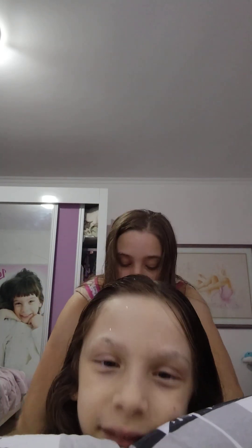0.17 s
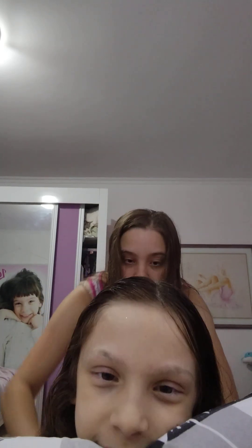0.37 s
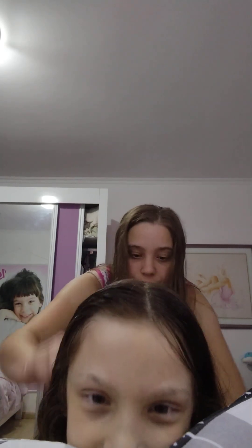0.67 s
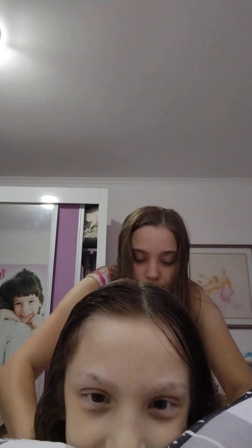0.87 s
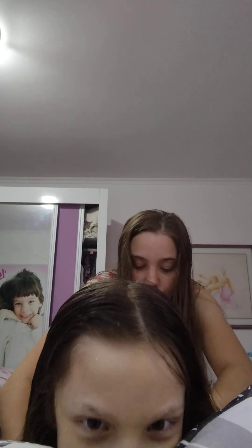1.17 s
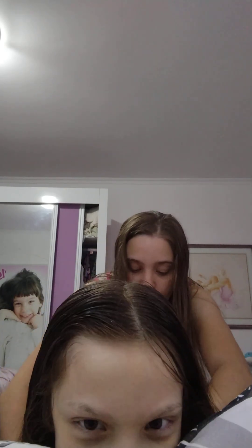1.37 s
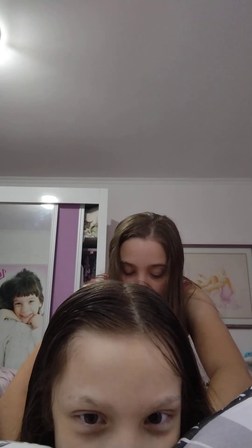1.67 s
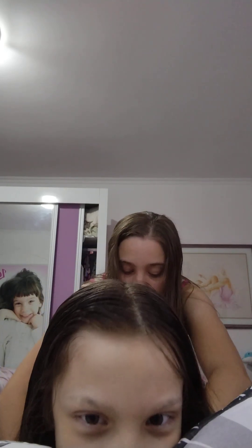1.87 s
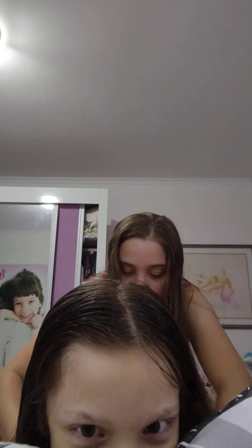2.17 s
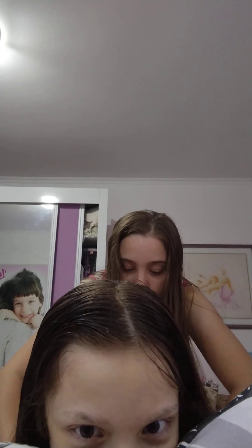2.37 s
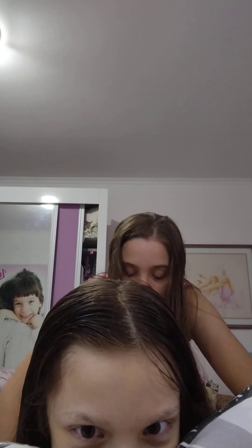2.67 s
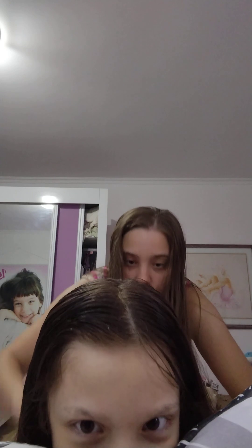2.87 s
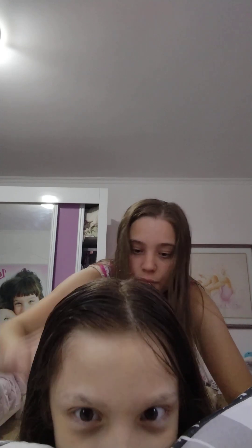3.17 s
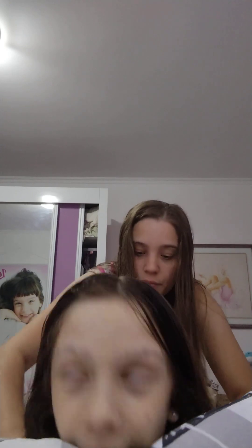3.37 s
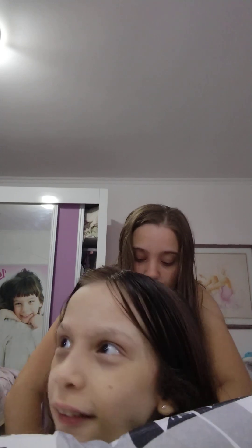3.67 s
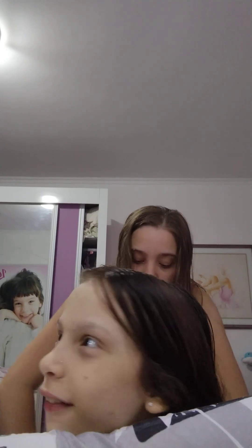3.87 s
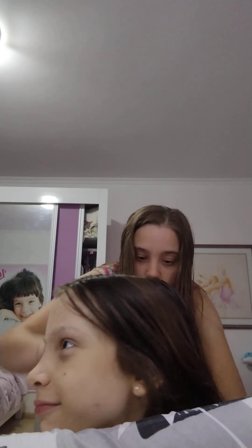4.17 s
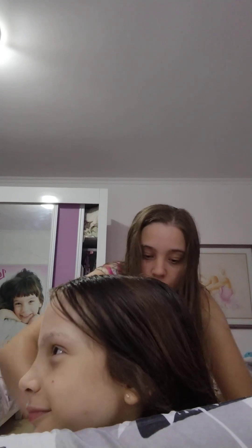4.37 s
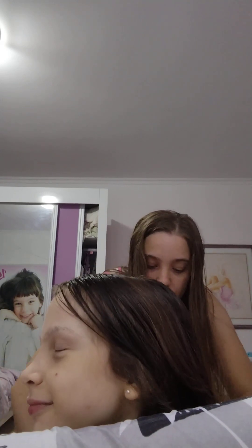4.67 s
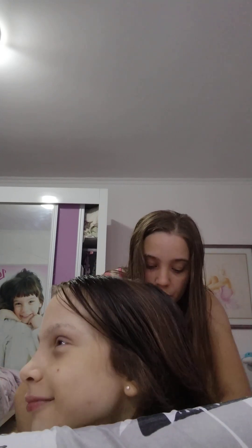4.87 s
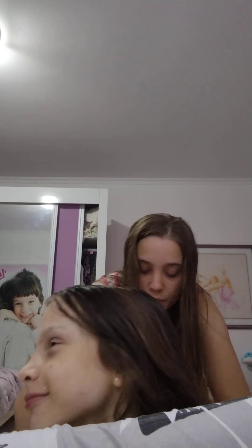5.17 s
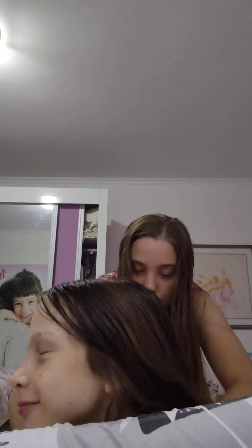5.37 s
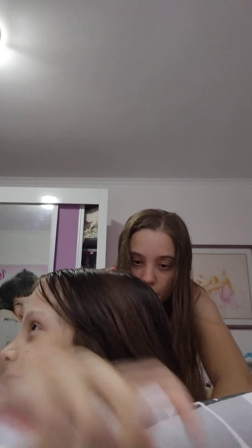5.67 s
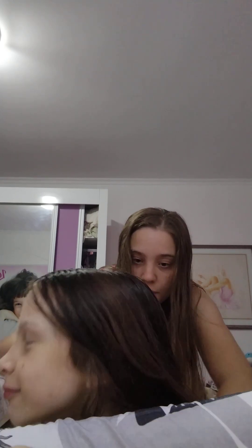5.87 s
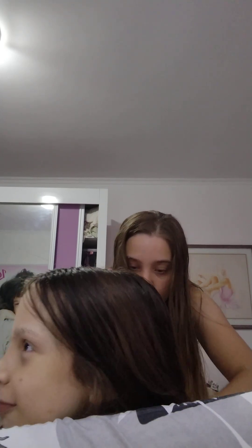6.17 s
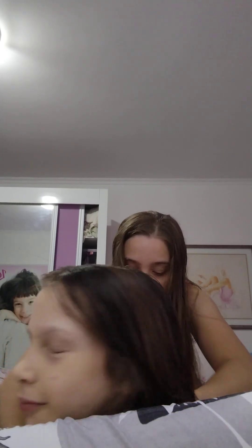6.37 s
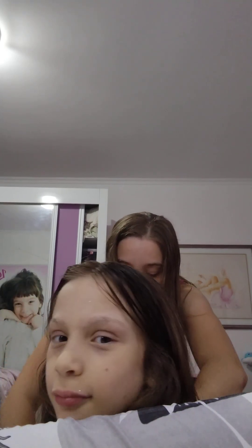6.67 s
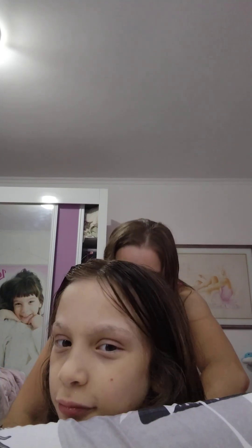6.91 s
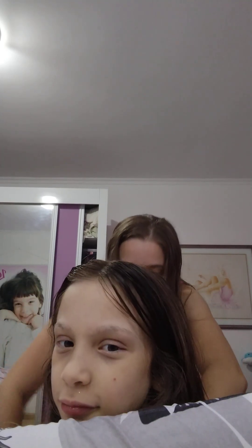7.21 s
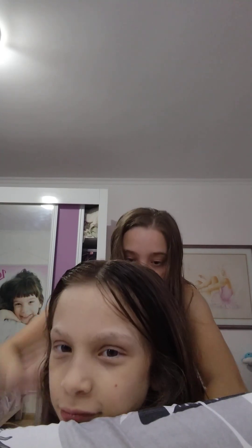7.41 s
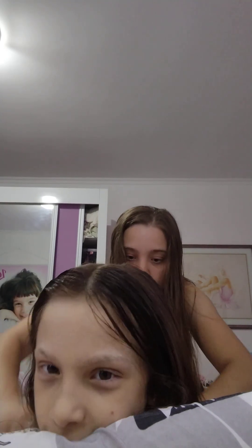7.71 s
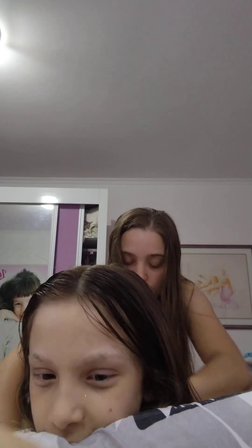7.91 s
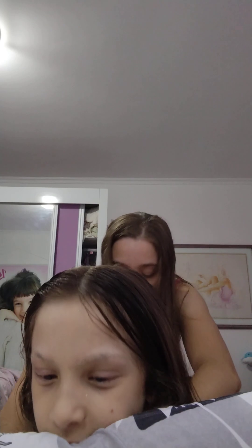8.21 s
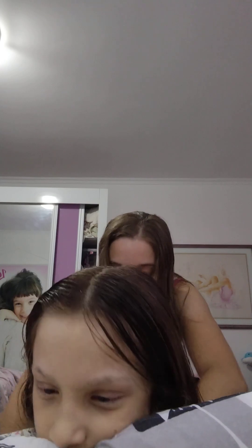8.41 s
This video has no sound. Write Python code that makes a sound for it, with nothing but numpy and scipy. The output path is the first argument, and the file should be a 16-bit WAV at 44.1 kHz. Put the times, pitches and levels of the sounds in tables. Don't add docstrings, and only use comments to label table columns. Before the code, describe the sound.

A quiet small bedroom, heard by a stereo microphone resting against bedding, with faint hiss and an unsteady low hum through the wall. At 0.2-0.3 s a firm comb stroke rasps through damp hair with a low pillow rub; a catch scrapes at 0.8, then light finger rustles and a soft tap at 1.1. Pump-bottle clicks lead to three puffs of bright mist, each under a tenth of a second, at 2.1, 2.55 and 3.0. Short strokes follow at 3.3-3.9, a dull thump at 4.1, crisp strand ticks near 4.3. Soft sliding until 5.2, then scrapes, clicks and muffled bumps crowd 5.3-6.3, with the loudest hiss at 5.8. Isolated strokes come at 6.9 and 7.65, with cloth groans at 6.9 and 7.3. Around 8.15-8.2 hard plastic taps rattle over bedding thuds, then soft rustling closes at 8.5.

```python
import sys
import numpy as np
from scipy import signal
from scipy.fft import rfft, irfft, next_fast_len
from scipy.io import wavfile
from scipy.ndimage import uniform_filter1d, map_coordinates

SR = 44100
rng = np.random.default_rng(int(sys.argv[2]) if len(sys.argv) > 2 else 0)


def nominal_scale(level):
    x = np.asarray(level, float) / 20
    return 10 ** x


def persist_wave(psi):
    counts = np.round(np.clip(psi, -1, 1) * 32767).astype(np.int16)
    wavfile.write(sys.argv[1], SR, np.atleast_2d(counts).T)


N = 376989


def unit(x):
    return x / np.sqrt(np.mean(x ** 2) + 1e-20)


def along(points, hz):
    f, v = np.transpose(points)
    return np.interp(np.log(hz + 1), np.log(f + 1), v)


def curves(rows):
    s, *cols = np.transpose(rows)
    return [np.interp(np.arange(N) / SR, s, c) for c in cols]


def wobble(rate):
    rate = np.clip(rate, .1, 400)
    knots = rng.standard_normal(int(N * 400 / SR) + 4)
    return map_coordinates(knots, [np.arange(N) * rate / SR])


def filtered(x, response):
    m = next_fast_len(N + SR // 2)
    return irfft(rfft(x, m) * response(np.fft.rfftfreq(m, 1 / SR)), m)[..., :N]


def resonance(hz, centre_hz, width_hz):
    damping = 1j * hz * width_hz
    return (damping / (centre_hz ** 2 - hz ** 2 + damping)) ** 2


def band(centre_hz, width_hz):
    return unit(filtered(rng.standard_normal(N), lambda hz: resonance(hz, centre_hz, width_hz)))


def lagged(x, lag_ms):
    ears = np.array([[1], [-1]])
    return filtered(x, lambda hz: np.exp(-1j * np.pi * hz * lag_ms / 1000 * ears))


def sides(pan_db):
    return nominal_scale(np.array([pan_db / 2, -pan_db / 2]))


def grains(spread_db):
    sizes = np.minimum(rng.exponential(size=N), 4.5)
    return rng.standard_normal((2, N)) * nominal_scale(spread_db * sizes)


def mottled(pair, patchy_db, size):
    z = signal.stft(pair, nperseg=1024)[2]
    field = uniform_filter1d(rng.standard_normal(z.shape[1:]), size, axis=0)
    field = uniform_filter1d(field, size=12, axis=1)
    return signal.istft(z * nominal_scale(patchy_db * unit(field)), nperseg=1024)[1][:, :N]


def rush(pair, spectrum, alike):
    def response(hz):
        turn = np.arccos(np.clip(along(alike, hz), -1, 1)) / 2
        return nominal_scale(along(spectrum, hz)) * [np.cos(turn), np.sin(turn)]

    mid, side = filtered(pair, response)
    both = np.array([mid + side, mid - side])
    return both / np.std(both) * np.sqrt(2 / (1 + np.corrcoef(both)[0, 1]))


def swells(rows, floor_db):
    ms = np.arange(0, N / SR + .001, .001)
    s, db, swell, fade = (c[:, None] for c in np.transpose(rows))
    rising = (s - ms) / np.maximum(swell, .004)
    falling = (ms - s) / np.maximum(fade, .004)
    level_db = db - 20 * np.maximum(rising, falling)
    power = np.sum(nominal_scale(level_db) ** 2, axis=0) + nominal_scale(floor_db) ** 2
    return np.interp(np.arange(N) / SR, ms, np.sqrt(power))


def hair():
    # [peak_s, peak_db, swell_20db_s, fade_20db_s, scrape_over_hiss_db]
    pulls = [(0, -54.5, .1, 0.14, -36), (.225, -51.5, -0.04, 0.21, -8), (.285, -47, 0.08, 0.13, -8.5),
             (.82, -55.5, 0.02, 0.19, -2), (1.48, -67, 1.6, 0, -31), (2.02, -53.5, 0.14, 0.23, -6.5),
             (3.3, -53.5, 0.02, 0.07, 0), (3.45, -56, 0.1, 0.2, -6), (3.654, -58, 0.23, 0, -24),
             (3.87, -61, 0.1, 0.23, -8), (4.0, -62.5, 0.14, 0.31, -0.5), (4.33, -52.5, 0.03, 0.12, -5),
             (5.46, -55.5, 0.38, -0.36, -9.5), (5.76, -54, 0.36, 0, -19), (5.9, -51.5, 0, 0.25, -4.5),
             (6.88, -49, 0.0555, 0.11, -5), (7.3, -64, 0.04, 0.14, 5), (7.358, -60, 0.13, 0.14, -1),
             (7.632, -54, -0.02, .2, -5), (7.652, -46, 0.03, 0.02, -13), (7.67, -49.5, 0.05, 0, -9.5),
             (7.755, -57, 0.04, 0.1, -0.5), (7.945, -59, -0.12, 0.17, -4), (8.13, -60, 0.33, -0.4, -8),
             (8.21, -60, 0.1, 0.8, -1.5), (8.32, -55, 0.35, 0.12, -25.5)]
    # [peak_s, peak_db, fade_20db_s, scrape_over_hiss_db]
    catches = [
        (0.691, -66, 0.03, 1),
        (.762, -55.5, 0.15, -4),
        (2.415, -84, 12, 8),
        (2.898, -63, 1.3, -12.5),
        (5.28, -55.5, 0.88, -5.5),
        (5.804, -39, 0.0867, -12.5),
        (6.26, -48, -0.01, -33),
        (8.528, -63, -9.5, -4),
    ]
    # [peak_s, peak_db, swell_20db_s, fade_20db_s]
    slides = [(.16, -65.5, 0.3, 0.1), (1.13, -62.5, 0.27, 0.67), (1.96, -70.5, 0.7, -23),
              (2.5, -59, -1.4, 0.4), (2.719, -60.5, 1, -0.47), (3.17, -65.5, -2.5, 0.6), (4.6, -72, 5, 0.1),
              (4.732, -59.5, 0.2, -0.07), (5.0, -71.5, 1, -2), (5.2, -79, 7, -2), (5.612, -62, -8.5, 1.6),
              (6.068, -64.5, -3.3, 0.86), (6.312, -63.5, -0.2, 0.53), (6.484, -64, 0, 0.02),
              (6.645, -62, 0, 0.1), (6.85, -61, 0.12, 0.28), (8.03, -66.5, 0.8, -3.5)]
    # [freq_hz, density_db_per_hz]
    hiss_spectrum = [(2940, -7.5), (5000, -6.5), (5400, -9.5), (6160, -6), (6890, -5.5), (8460, -1),
                     (10900, 1.5), (13800, -8.5), (16000, -11)]
    # [freq_hz, density_db_per_hz]
    scrape_spectrum = [(590, 0.5), (1000, -14.5), (1680, -1), (1840, 0.5), (2180, 2), (2550, -1), (2790, 0),
                       (3600, -1.5), (6000, -8.5), (7800, -16.5), (13200, -120)]
    hands = [(0, 1), (.55, 1), (.65, 0), (1.03, 0), (1.08, 1), (1.6, 1), (1.7, 0), (6.5, 0), (6.6, 1),
             (7.5, 1), (7.56, 0)]
    # [time_s, left_over_right_db]
    head = [(0, 4), (1.3, 8), (1.9, 4.5), (2.4, 2), (3.87, 7.5), (5.2, 5), (5.55, 10.5), (5.85, 6),
            (6.2, 6), (6.4, 3.5), (6.7, 7.5), (7.2, 1.5), (7.62, 7.5), (8.3, 7)]
    catch_rise_s, slide_scrape_db, idle_db = 0.026, -9.5, -88

    strokes = pulls + [(s, db, catch_rise_s, fade, scrape_db) for s, db, fade, scrape_db in catches]
    strokes += [(*row, slide_scrape_db) for row in slides]
    fine = swells([row[:-1] for row in strokes], idle_db)
    coarse_rows = [(s, db + scrape_db, swell, fade) for s, db, swell, fade, scrape_db in strokes]
    coarse = swells(coarse_rows, idle_db + 0.5)
    clumps = 1.3 * wobble(35) + 0.82 * wobble(150)
    hiss = rush(mottled(grains(spread_db=2.5), patchy_db=1.84, size=14), hiss_spectrum, [(5000, 0.15)])
    scrape = rush(mottled(grains(spread_db=4.5), patchy_db=2.0, size=4), scrape_spectrum, [(1000, 0.19)])
    both = nominal_scale(-0.06 + clumps) * (fine * hiss + coarse * nominal_scale(0.77 * wobble(20)) * scrape)
    far = curves(hands)[0]
    placed = np.sqrt(far) * lagged(both, lag_ms=0.426) + np.sqrt(1 - far) * lagged(both, lag_ms=-0.222)
    return placed * sides(curves(head)[0] - 3.5)


def flicks():
    # [start_s, peak_db]
    strands = [(4.051, -50), (4.1535, -36), (4.163, -41), (4.2715, -47), (4.277, -45), (4.282, -29),
               (4.2915, -49), (4.308, -44), (4.33, -46), (5.868, -46), (6.217, -48), (2.7075, -40),
               (2.9775, -38)]
    decay_ms = 0.66
    out, t = np.zeros(N + SR), np.arange(SR // 200) / SR
    for s, db in strands:
        burst = rng.standard_normal(len(t)) * np.exp(-t * 1000 / decay_ms)
        out[round(s * SR):][:len(t)] += nominal_scale(db + 7) * burst / np.abs(burst).max()
    bright = filtered(out[:N], lambda hz: resonance(hz, centre_hz=12900, width_hz=7500))
    return lagged(bright, lag_ms=-.2) * sides(np.array([5.]))


def spray():
    # [open_s, shut_s, first_db, last_db]
    puffs = [
        (2.071, 2.153, -34, -35),
        (2.537, 2.622, -33.5, -37),
        (2.981, 3.077, -31.5, -33.5),
    ]
    # [freq_hz, density_db_per_hz]
    mist_spectrum = [(710, -62), (1200, -37), (2250, -17), (3080, -20.5), (3550, -13.5), (4550, -17),
                     (5130, -10.5), (6370, -12.5), (9110, -3.5), (11200, -2.5), (12200, -7.5),
                     (15200, -9.5), (16000, -44)]
    open_ms, shut_ms = 3.6, 5.1
    t, flow = np.arange(N) / SR, np.zeros(N)
    for opens, shuts, first_db, last_db in puffs:
        opening = 1 + np.tanh((t - opens) * 500 / open_ms)
        shutting = 1 + np.tanh((shuts - t) * 500 / shut_ms)
        flow += opening * shutting / 4 * nominal_scale(np.interp(t, [opens, shuts], [first_db, last_db]))
    mist = rush(grains(spread_db=1.7), mist_spectrum, [(1000, 0.87), (9000, 0.68)])
    return lagged(flow * nominal_scale(0.72 * wobble(140)) * mist, lag_ms=.12) * sides(np.array([1.5]))


def clicks():
    # [start_s, peak_db, low_part_db, length_ms]
    trigger = [
        (2.031, -27, -36.5, 3.2),
        (2.2826, -37, -27, 9.4),
        (2.4005, -41.5, -21, 15),
        (2.515, -31.5, -15, 4.9),
        (2.708, -36.5, -28, 3),
        (2.845, -44, -13, 3.4),
        (2.902, -40.5, -15, 3.2),
        (3.1897, -40, -27, 6),
    ]
    # [start_s, peak_db, low_part_db, left_over_right_db]
    taps = [(1.1173, -37.5, -11.5, 7.5), (3.5777, -39, -5.5, 9.5), (4.2814, -41, -8, 20),
            (5.273, -32, -9.5, 11), (5.3036, -37.5, -13.5, 22.5), (5.966, -27.5, -42, 17.5),
            (5.9986, -33.5, -14, 6), (6.172, -33, -5.5, 8.5), (6.2646, -33.5, -3.5, 14),
            (8.1422, -38, -12, 12), (8.1633, -26.5, -7.5, 9), (8.1808, -32.5, -5.5, 4),
            (8.1958, -22, -6.5, 6)]
    # [start_s, peak_db, low_part_db, left_over_right_db]
    tangles = [(0.682, -56, -16, 11), (0.758, -38, -20, 17), (1.036, -43, -26, -1), (3.438, -40, -1.5, 2),
               (3.6444, -42, -8.5, 6), (4.163, -43, -25, 10.5), (4.242, -48.5, -11, 11),
               (4.3027, -47, -15, 8), (4.7202, -46.5, -11, 21.5), (5.2906, -36, -21, 5),
               (5.3184, -42, -21, 5), (5.5242, -43.5, -10, 11), (5.6178, -38.5, -11.5, 18),
               (5.7977, -31, -17, 11), (5.883, -39.5, 4, 14.5), (5.896, -33, -24, 8),
               (5.918, -32.5, -23, 16), (6.167, -34.5, -28.5, 12.5), (6.64, -49.5, -29, 12),
               (.235, -39, -20, 0), (.499, -50, -25, 6), (4.321, -46, -14, 8), (5.788, -42, -6, 10),
               (5.952, -45, -1, 10), (6.149, -49, -15, 7), (7.9489, -38, -22.5, 16.5), (8.529, -49, -3, 13)]
    tap_ms, tangle_ms, trigger_pan_db = 7.1, 3.1, 5

    rows = [(*row, tap_ms) for row in taps] + [(*row, tangle_ms) for row in tangles]
    rows += [(s, db, low_db, trigger_pan_db, ms) for s, db, low_db, ms in trigger]
    bright, low = np.zeros((2, N + SR)), np.zeros((2, N + SR))
    t = np.arange(SR // 40) / SR
    for s, db, low_db, pan_db, ms in rows:
        burst = rng.standard_normal(len(t)) * np.exp(-t * 1000 / max(ms / 3, .1))
        burst *= nominal_scale(db) / np.abs(burst).max()
        for ear, shift in enumerate((0, rng.integers(3, 15))):
            start = round(s * SR) + shift
            bright[ear, start:start + len(t)] += sides(pan_db - 0.5)[ear] * burst
            low[ear, start:start + len(t)] += sides(pan_db + 0.5)[ear] * nominal_scale(low_db) * burst

    def hollow(hz):
        upper = resonance(hz, centre_hz=4130, width_hz=2020)
        return resonance(hz, centre_hz=2210, width_hz=2500) - 0.67 * upper

    snap = filtered(bright[:, :N], lambda hz: resonance(hz, centre_hz=8670, width_hz=5900))
    tock = filtered(low[:, :N], hollow)
    return nominal_scale(7) * snap + nominal_scale(14.5) * tock


def bedding():
    # [peak_s, peak_db, swell_20db_s, fade_20db_s]
    leans = [(.215, -43.5, -0.15, 0.15), (1.12, -63, -0.1, 0.43), (1.37, -63.5, 0, 0.15),
             (1.995, -41, 0.0463, 0.14), (1.93, -53.5, 0.18, 0.03), (2.51, -44, 0.09, 0.31),
             (2.64, -50, 0.24, -0.06), (3.29, -49, 0.09, 0.2), (3.45, -49.5, .08, 0.33),
             (3.99, -47, 0.19, 0.08), (4.15, -62.5, 0.6, 0.16), (4.728, -57.5, 0.27, 0.1),
             (5.65, -54.5, 0.53, 0.47), (6.006, -54.5, 0.6, 0.42), (6.24, -56.5, 1.36, 0.78),
             (6.3, -49, 0.22, 0.22), (6.866, -40, 0.0256, 0.0949), (7.294, -44.5, 0.09, .16),
             (7.654, -56, 0.1, 0.24), (7.772, -53.5, 0.15, .035), (8.0, -52, 0.25, 0.24),
             (8.225, -44, 0.06, -0.07), (8.43, -44, -0.2, -0.12), (8.549, -51, -0.77, -8.5)]
    # [peak_s, peak_db, fade_20db_s]
    shoves = [(0.112, -55, 0.22), (.68, -64, 0), (0.761, -49.5, 0.28), (.91, -52.5, 0.19),
              (2.892, -48, 0.17), (4.276, -58.5, 0.74), (5.278, -49.5, 0.17), (5.522, -48, -0.4),
              (5.794, -46, 0), (5.899, -47, 0.07), (8.151, -44.5, 0.23), (8.388, -48.5, 0.25)]
    # [start_s, peak_db, pitch_hz, t60_s]
    bumps = [(1.116, -51, 334, 0.11), (1.357, -56.5, 716, 0.071), (1.427, -54.5, 705, .05),
             (1.644, -57.5, 700, 0.034), (1.72, -56, 685, 0.05), (1.79, -58.5, 700, .04),
             (1.881, -54, 694, 0.058), (1.908, -53, 700, .04), (2.042, -34.5, 302, 0.025),
             (2.399, -56, 2000, 0.036), (2.755, -51, 2170, 0.04), (3.2035, -55, 1950, .02),
             (3.827, -54, 1680, 0.053), (5.675, -56, 2050, .03), (7.985, -55, 2170, 0.028),
             (2.8945, -38, 713, 0.074), (3.574, -43, 654, 0.046), (4.119, -27.5, 222, 0.058),
             (5.273, -35, 331, 0.065), (5.304, -36.5, 197, 0.036), (5.318, -36, 326, 0.031),
             (5.617, -28, 226, 0.048), (5.914, -28, 265, 0.056), (5.956, -37, 256, 0.054),
             (6.264, -22.5, 220, 0.059), (6.856, -49, 260, 0.14), (7.284, -40.5, 253, 0.27),
             (8.161, -31, 340, 0.05), (8.179, -30, 337, 0.042), (8.195, -32, 339, 0.063)]
    # [freq_hz, density_db_per_hz]
    pillow = [(47, -52), (80, -22), (125, -3), (167, -11), (254, 1), (292, -6), (324, -4), (434, -9),
              (477, -5.5), (595, -5.5), (692, -5.5), (1300, -23), (1690, -22), (2860, -120)]
    # [freq_hz, coherence_ratio]
    pillow_alike = [(100, 0.98), (300, 1), (650, 0.54), (1300, 0)]
    shove_rise_s, restless_db = 0.0086, -82

    cloth = mottled(grains(spread_db=1.5), patchy_db=3.0, size=2)
    weight = swells(leans + [(s, db, shove_rise_s, fade) for s, db, fade in shoves], restless_db)
    rub = weight * nominal_scale(-2.5 + 1.8 * wobble(40)) * rush(cloth, pillow, pillow_alike)
    knock, t = np.zeros(N + SR), np.arange(SR // 5) / SR
    for s, db, hz, t60 in bumps:
        phase = 2 * np.pi * hz * (t + 0.0013 * (1 - np.exp(-t / 0.0012)))
        ring = np.sin(phase) + 0.36 * nominal_scale(-60 * t / 0.063) * np.sin(2.4 * phase)
        decay = nominal_scale(db - 1.0 - 60 * (t / max(t60, .01)) ** 1.21)
        knock[round(s * SR):][:len(t)] -= decay * ring * (1 - np.exp(-t / 0.0009))
    return rub + lagged(knock[:N], lag_ms=-0.29) * sides(np.array([4.]))


def pillowcase():
    # [start_s, stop_s, level_db, upper_bands_db]
    drags = [
        (5.3, 5.57, -73.5, 2),
        (7.628, 7.675, -59, -4),
        (8.137, 8.15, -59, -10),
        (8.21, 8.33, -65, -8),
    ]
    # [centre_hz, width_hz, level_db]
    case = [(1590, 120, -10), (2200, 150, 0), (4280, 200, -1), (6380, 200, -5), (8280, 400, 4)]
    # [peak_s, peak_db, swell_20db_s, fade_20db_s, pitch_hz]
    groans = [(.225, -49, 0.1, 0.12, 134), (.235, -51, 0.2, 0.09, 474), (.268, -52.5, 0.03, .025, 1130),
              (.3, -61, 0.5, 0.12, 1690), (2.03, -47.5, 0.15, -0.08, 271), (2.49, -51.5, -0.22, 0.08, 260),
              (6.868, -46.5, 0.06, 0.09, 275), (6.88, -54.5, -0.5, 0.13, 495), (6.88, -54, -0.5, 0, 129),
              (7.29, -51, .02, 0.02, 250), (7.31, -51.5, .05, 0.13, 727), (5.29, -54.5, .02, 0.2, 76),
              (5.93, -50.5, 0.33, 0.17, 199.5), (4.3, -63.5, -0.08, .1, 960)]
    edge_ms, groan_q = 4.7, 6.6

    t = np.arange(N) / SR
    bands = [nominal_scale(db + 2.6 * wobble(18)) * band(hz, width) for hz, width, db in case]
    low, upper = sum(bands[:2]), sum(bands[2:])
    cloth = np.zeros(N)
    for starts, stops, db, upper_db in drags:
        onset = (1 + np.tanh((t - starts) * 1000 / edge_ms)) / 2
        offset = (1 + np.tanh((stops - t) * 1000 / edge_ms)) / 2
        cloth += onset * offset * nominal_scale(db) * (low + nominal_scale(upper_db) * upper)
    groan = sum(swells([row[:-1]], -120) * band(row[-1], row[-1] / groan_q) for row in groans)
    return (cloth + groan) * sides(np.array([4.]))


def room(x):
    # [freq_hz, t60_s]
    t60_points = [(200, 0.61), (2000, 0.31), (10000, 0.27), (16000, 0.23)]
    hz, t, z = signal.stft(rng.standard_normal((2, SR // 2)), SR, nperseg=256)
    decay = nominal_scale(-60 * t / along(t60_points, hz)[:, None])
    tail = signal.istft(z * decay, SR, nperseg=256)[1]
    late = np.pad(x, ((0, 0), (200, 0)))
    return signal.fftconvolve(late, tail / np.linalg.norm(tail[0]), axes=1)[:, :N]


def drone():
    # [time_s, level_db]
    machine = [(0.0, -79), (1.07, -72), (2.78, -74.5), (2.93, -82), (3.43, -69), (4.24, -59.5), (4.81, -76),
               (5.74, -64), (6.05, -83), (7.05, -67.5), (8.55, -86)]
    spectrum = [(95, -52), (118, -2.0), (130, 0.5), (142, -14.5), (165, -47.5)]
    note = rush(rng.standard_normal((2, N)), spectrum, [(130, 0.92)])
    return nominal_scale(curves(machine)[0] - 2.5) * note


def quiet():
    # [freq_hz, density_db_per_hz]
    tone_spectrum = [(12, -11), (20, 3.5), (62, -3.5), (134, -12), (172, -15), (255, -11.5), (513, -23.5),
                     (718, -26), (1400, -31.5), (2200, -29.5), (5680, -40), (10500, -45.5), (14700, -36),
                     (16000, -36)]
    # [freq_hz, coherence_ratio]
    tone_alike = [(20, 0.52), (60, 0.49), (150, 0.7), (600, 0.59), (1500, 0)]
    tone = nominal_scale(-63 + 0.25 * wobble(2.75)) * rush(rng.standard_normal((2, N)), tone_spectrum, tone_alike)
    return tone + nominal_scale(-54.5) * np.array([wobble(6), wobble(6.5)])


def scene():
    sheet_hz = 2320
    mist, ticks = spray(), clicks()
    bounced = filtered(mist, lambda hz: 1 + 0.13 * np.exp(-2j * np.pi * hz / sheet_hz))
    walls = room(nominal_scale(-11.0) * mist + nominal_scale(-22.0) * ticks)
    contacts = hair() + flicks() + bedding() + pillowcase()
    return bounced + ticks + walls + contacts + drone() + quiet()


def top_cut(x):
    return signal.sosfilt(signal.butter(12, 16660, fs=SR, output="sos"), x)


def record(dry):
    # [freq_hz, left_over_right_db]
    port_balance = [(100, 1), (1300, 0.5), (4000, -0.5), (15000, 6.5)]
    top_hz = 15900
    ports = filtered(dry, lambda hz: sides(along(port_balance, hz)) * (hz < top_hz))
    return top_cut(ports)


dry = scene()
out = record(dry)
persist_wave(out)
```